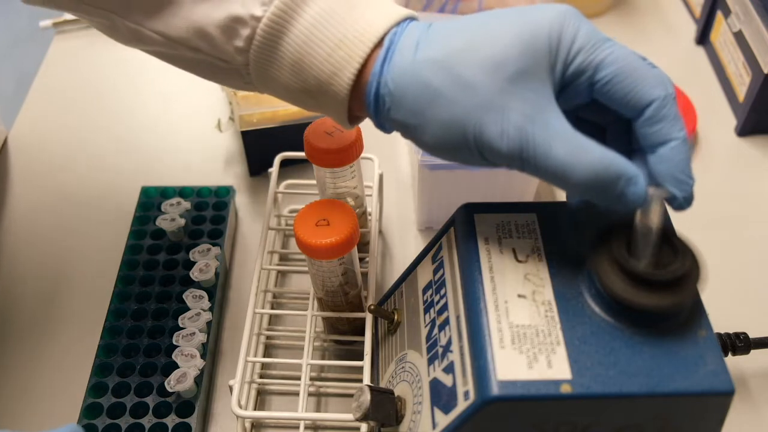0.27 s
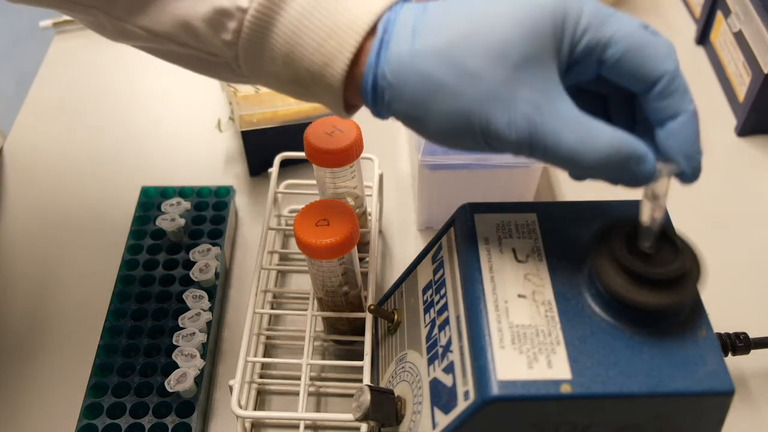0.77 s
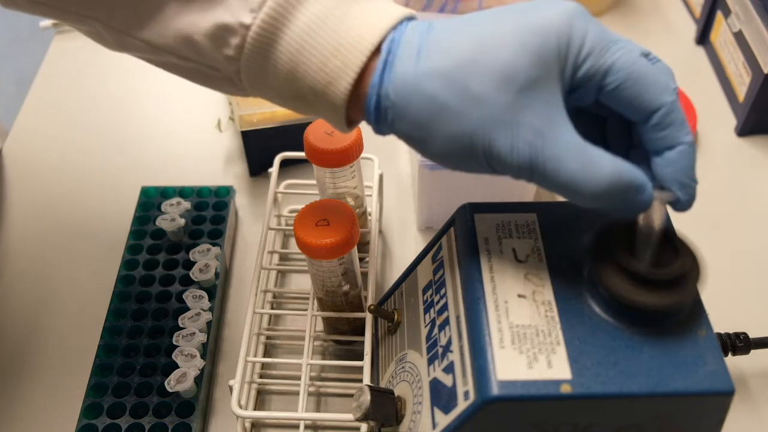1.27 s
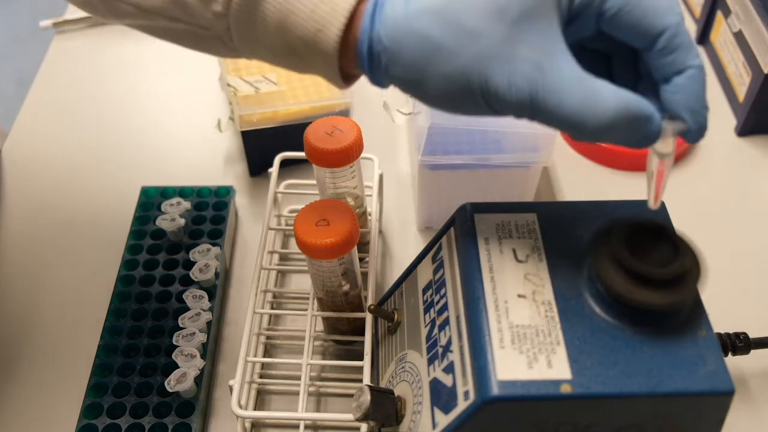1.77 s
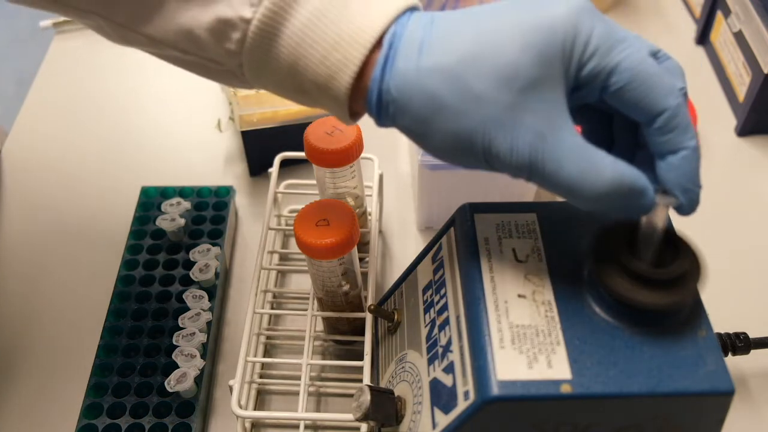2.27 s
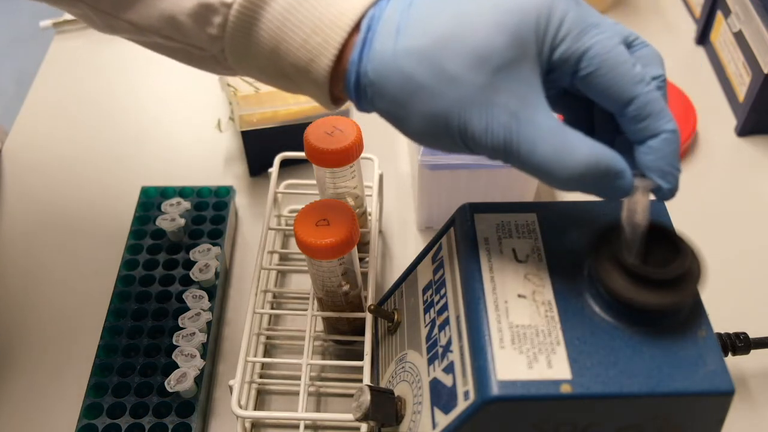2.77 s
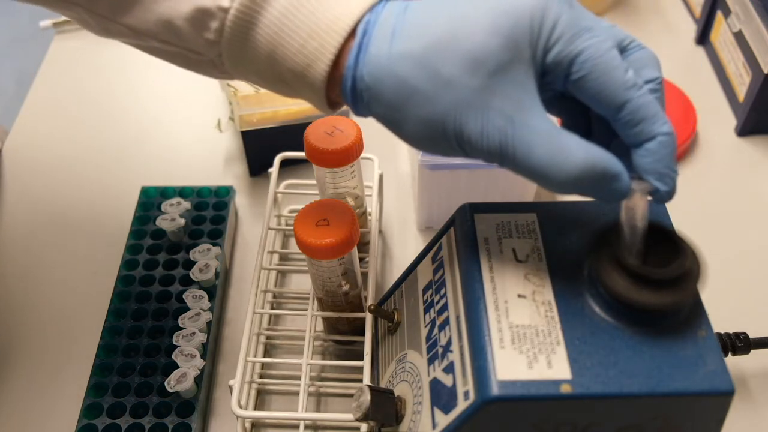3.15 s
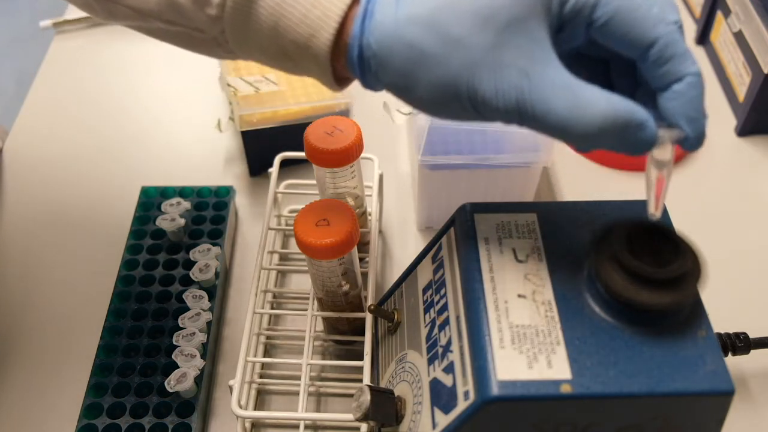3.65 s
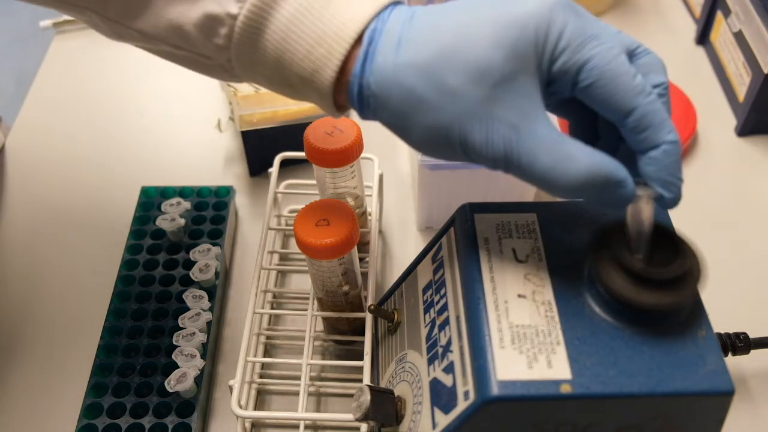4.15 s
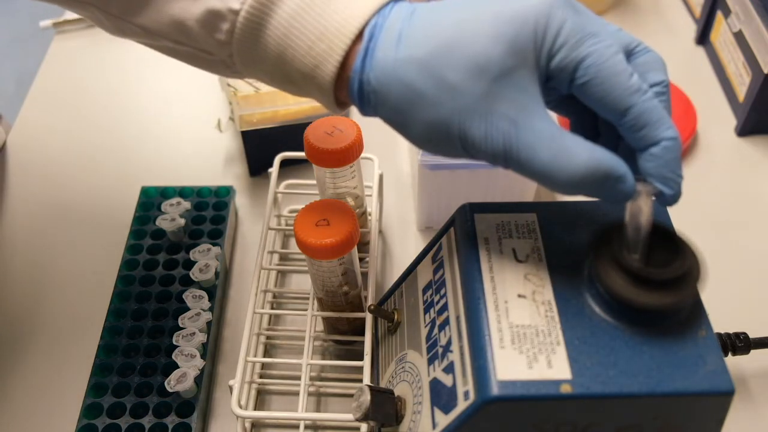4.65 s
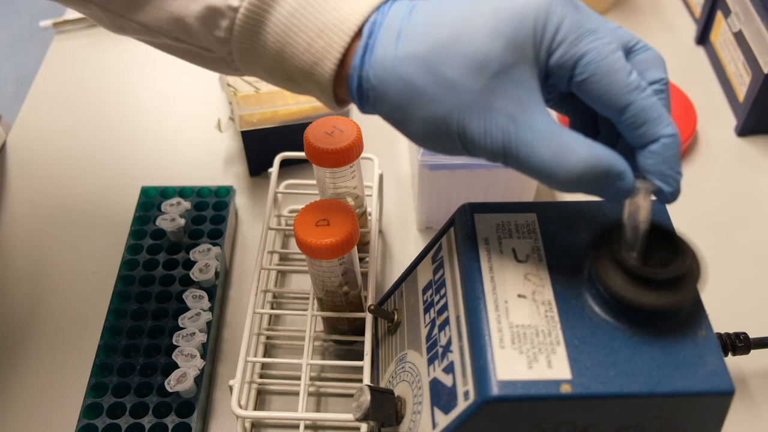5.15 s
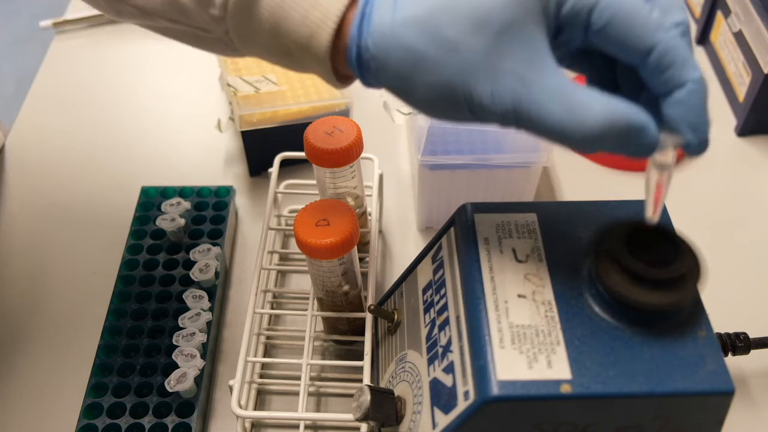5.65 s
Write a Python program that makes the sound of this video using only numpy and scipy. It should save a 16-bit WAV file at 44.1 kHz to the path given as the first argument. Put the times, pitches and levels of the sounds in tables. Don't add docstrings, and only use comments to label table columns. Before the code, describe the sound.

A small electric mixer runs on a lab bench, heard close in stereo. Its low, rough buzz, pulsing about 46 times a second, fades up over the first second and continues to the end with slight dips and surges in speed. Fine bearing hiss and a very faint distant machine drone sit underneath. A plastic tube against the spinning rubber cup chatters softly until 0.4 s, then ticks and rattles hard from 0.8 to 1.5 s, loudest around 1 s. After a gap of mostly humming, loose ticks scatter from 1.9 to 2.3 s, with a brief buzzing lean to 2.4. A longer, duller rattle runs from 2.8 to 3.4 s; sharper bursts follow at 3.8-4.1 and 4.2-4.5 s. Contact is faint around 5 s, a few light ticks lift off at 5.4, and fresh ticks land from 5.8 s as the mixer keeps buzzing.

```python
import sys
import numpy as np
from scipy import signal
from scipy.fft import rfft, irfft
from scipy.io import wavfile
from scipy.ndimage import uniform_filter1d

SR = 44100
rng = np.random.default_rng(int(sys.argv[2]) if len(sys.argv) > 2 else 0)


def wav_record(signal):
    frames = np.transpose(np.atleast_2d(signal))
    bounded = np.clip(frames, -1, 1)
    quanta = np.round(bounded * 32767).astype(np.int16)
    wavfile.write(sys.argv[1], SR, quanta)


def invert_db(x):
    u = np.asarray(x, float) / 20
    return 10 ** u


N = 261072

# time_s, speed_turns_per_s
DRIVE_SPEED = [(0.0, 45.6), (0.375, 45.44), (0.5, 46.52), (0.625, 45.74), (1.375, 45.37), (1.5, 46.42),
               (1.625, 45.63), (2.0, 45.89), (2.125, 45.42), (2.625, 45.92), (2.75, 45.52), (3.25, 45.68),
               (3.375, 45.97), (4.0, 45.6), (5.0, 45.78), (5.25, 45.59), (5.375, 45.89), (5.92, 45.45)]
# order_per_turn, level_db
THUMP_ORDERS = [(1, -19), (2, -5), (3, -6), (4, 0), (5, -4), (6, -3.5), (7, -13), (8, -14.5), (9, -16.5),
                (10, -7.5), (11, -6.5), (12, -21), (13, -20), (14, -22.5), (15, -23), (16, -28),
                (17, -29.5), (18, -27.5), (19, -31), (20, -50), (21, -30.5), (22, -59), (23, -30.5),
                (24, -57.5), (25, -52), (26, -45)]
# mode_hz, width_hz, level_db
CASE_MODES = [(95, 26.4, 4.5), (178.9, 29.7, 2), (235.4, 20.5, 0), (266.3, 36, -3), (354, 37, -11.5),
              (455, 11.5, -6), (502, 16.4, -7), (630, 17.4, -24.5), (724, 10, -34.5), (799, 32, -38),
              (935, 25, -28.5), (1053, 30, -34)]
THUMP_ANGLE_TURNS = 0.04
# time_s, level_db
LOW_ORDER_LEVEL = [(0, -40), (.25, -33.5), (.54, -28), (.79, -24.5), (1.3, -23), (1.6, -22), (1.92, -21),
                   (2.0, -22.5), (2.65, -22.5), (3.6, -21.5), (4.27, -22), (4.36, -22.5), (5.5, -21), (5.92, -21)]
PANEL_ORDERS_DB, PANEL_FLUTTER_DB, PANEL_FLUTTER_HZ = -8.5, 0.32, 9.3

# pitch_hz, level_db_rms
FAR_MACHINE = [(24.6, -49.5), (49.4, -50.5)]

# freq_hz, level_db_per_hz
JOLT_SPECTRUM = [(40, 0.5), (90, 5), (150, 3.5), (280, 7.5), (350, -13), (520, 1), (750, -12.5),
                 (940, -28.5), (1100, -23), (1600, -39)]
# time_s, jolting_db, panel_order_loss_db
UPSETS = [(.13, -52, 6), (.49, -37, 16), (.82, -45, 3.5), (.95, -27.5, 17), (1.05, -27, 11),
          (1.15, -31, 2.5), (1.24, -33, 8), (1.48, -35, 16), (1.66, -46, 0), (1.75, -46, 1), (1.91, -36, 2),
          (1.98, -44, 5), (2.16, -34, -1.5), (2.28, -30, 8), (2.4, -44, 7), (2.52, -46, 3.5),
          (2.63, -40, 4), (2.75, -35, 2.5), (2.98, -60, -1), (3.84, -33, 7), (4.27, -42, -0.5),
          (4.35, -49, 6), (4.78, -41, 3.5), (4.91, -47, 2), (5.21, -35, -1.5), (5.28, -43, 2.5),
          (5.41, -36, 5.5), (5.84, -37, 6)]
UPSET_HALF_S, REST_JOLT_DB = 0.051, -24
LOW_LOSS_SHARE = 0.14
PANEL_HZ, PANEL_WIDTH_HZ, PANEL_DB = 432, 16.4, -10

# freq_hz, level_db_per_hz
HISS_SPECTRUM = [(530, -11.5), (900, -1.5), (1080, -7.5), (1160, -3.5), (1630, -12.5), (2490, -9),
                 (2780, -25), (3030, -38), (3590, -16), (6350, -14.5), (8390, -27.5), (15200, -53),
                 (16400, -40)]
# pitch_hz, width_hz, level_db
BEARING_WHINES = [(2524, 36, -16), (2980, 94, -12.5), (3410, 130, -18), (4630, 69, -22.5),
                  (6380, 73, -20.5)]
HISS_DB, HISS_DB_PER_BASE_DB, HISS_DB_PER_LOAD_DB = -49.5, 0.5, 0.26

# freq_hz, level_db_per_hz
CRACK_SPECTRUM = [(650, -48.5), (1100, -18.5), (1380, 1.5), (1770, -9), (2290, -13.5), (3040, -1),
                  (4310, -2.5), (4670, -0.5), (9090, -8), (9950, -4.5), (11900, -14.5), (14800, -15.5),
                  (16400, -5.5)]
# mode_hz, level_db, t60_s
TUBE_MODES = [(116, -17, 0.1), (250, -15, 0.047), (449.8, 0.5, 0.14), (935, -11.5, 0.052),
              (1330, -11, 0.021), (2120, -5, .025), (2297, 0.5, 0.013), (2442, -5, 0.014),
              (4680, -6, 0.015), (5220, -7.5, 0.03), (10100, -30, .012)]
# start_s, end_s, angle_turns, lift_advance_turns, peak_db
LEANING = [
    (-.08, 0.147, 0.49, -.03, -36),
    (0.164, 0.366, 0.6, 0.1, -29.5),
    (1.061, 1.54, .515, .33, -25.5),
    (1.181, 1.506, 0.58, 0.19, -23.5),
    (1.222, 1.513, .75, 0.25, -26),
    (2.274, 2.424, 0.54, 0.12, -25),
]
SINK_TURNS_PER_S, LIFT_S, LEANING_BRIGHT_DB = 0.3, 0.12, 1.5
SETTLE_S, SETTLE_DB = 0.05, 6
DULL_DB_PER_SOFT_DB, LIFT_LOSS_DB = 0.27, 3.5
# (time_s, half_gap_turns, peak_db)
ROCKING = [
    (.755, 0.5, 0.5, [(.9, .215, -17), (.97, .225, -16), (1.05, .2, -21.5)]),
    (.865, 5, -4, [(2.77, .15, -24.5), (2.83, .225, -22), (2.92, 0.29, -21), (3.05, .22, -22), (3.21, .155, -26.5), (3.3, .175, -25), (3.385, 0.32, -22)]),
    (.875, 5, -5, [(3.88, .325, -20), (3.95, .28, -18), (4.02, 0.14, -20), (4.1, .06, -27.5)]),
    (.84, 8, -2.5, [(4.2, 0.056, -33), (4.28, 0.11, -24), (4.36, .15, -22), (4.44, .13, -23.5), (4.5, .02, -38)]),
    (1, 0.5, -2, [(4.97, 0.22, -38), (5.05, 0.084, -38), (5.14, 0.027, -37)]),
]
LOWER_BRIGHT_DB_PER_DB = 1
# time_s, peak_db, bright_db
LANDING_TICKS = [(.7783, -27, 6.5), (0.7967, -21.5, 5), (0.899, -20, 0), (.9054, -33, 3),
                 (1.937, -21.5, 0.5), (2.1122, -22, -6), (2.1256, -30, 9), (2.135, -18, 0),
                 (2.1452, -21.5, 2), (2.165, -20.5, 4), (2.1818, -28, 1), (2.1952, -27, 7),
                 (2.2138, -26.5, 3), (2.234, -29, 8.5), (2.2597, -30, 10.5), (2.774, -37, 5),
                 (2.7797, -37, 9), (3.8029, -28, 10), (3.8197, -18, 3.5), (4.241, -34, 0), (4.2664, -48, 2),
                 (5.776, -33, 1.5), (5.7933, -21.5, 7.5), (5.8094, -27, 8), (5.8642, -29, -1),
                 (5.8811, -42, 2), (5.887, -21.5, -0.5), (5.9095, -25, 3)]
LANDING_RING_HZ, LANDING_RING_SPREAD = 2200, 0.097
# time_s, peak_db, bright_db, ring_hz
LIFTING_TICKS = [(0.449, -33, -6, 1770), (0.474, -37.5, 8, 2320), (0.4972, -32.5, 6.5, 2960),
                 (1.0495, -16.5, 0, 2740), (1.0687, -28, 4, 2350), (1.5232, -25.5, 7, 2170),
                 (3.4277, -24, 1, 2190), (3.4544, -31, 9.5, 3330), (4.4938, -28, -15, 2980),
                 (4.5093, -26.5, -11, 2860), (4.525, -33, -10, 2930), (5.4005, -38, -1, 2200),
                 (5.405, -33, -1, 1600), (5.4174, -26.5, 1, 2120), (5.445, -28, 9.5, 3650)]

# start_s, end_s, droning_db
CUP_LOADS = [(0.21, 0.383, -48.5), (0.753, 0.812, -51), (0.914, 1.077, -36), (1.25, 1.58, -43.5),
             (1.335, 1.46, -42.5), (2.094, 2.167, -37), (2.774, 3.447, -49.5), (3.82, 3.86, -39),
             (3.87, 4.098, -41), (4.226, 4.316, -34), (4.397, 4.525, -38.5), (4.93, 5.237, -46.5),
             (5.39, 5.75, -74), (5.857, 5.95, -33.5)]
LOAD_EDGE_S, REST_CUP_DB = 0.068, -29.5

# freq_hz, likeness_0_to_1
MIC_LIKENESS = [(60, 0.69), (200, 0.97), (500, 0.9), (1000, 0.8), (2000, 0.71), (4000, 0.57), (8000, 0.42),
                (15000, 0.17)]
# freq_hz, left_minus_right_db
MIC_TILT = [(60, -0.5), (110, -0.5), (200, 0.0), (380, 1.0), (700, 1.0), (1290, -1.0), (2380, -1.0),
            (4400, 1.0), (8120, -2.8), (15000, -6.5)]
LEFT_LAG_S, SELF_NOISE_DB = 4.2e-5, -61.5


def rms_one(x):
    return x / np.sqrt(np.mean(x ** 2) + 1e-20)


def noise():
    return rng.standard_normal((2, N))


def in_time(rows):
    time_s, *columns = np.transpose(rows)
    return [np.interp(np.arange(N) / SR, time_s, column) for column in columns]


def at_hz(points, hz):
    freq_hz, value = np.array(points)[:, 0], np.array(points)[:, 1]
    return np.interp(np.log(hz + 1), np.log(freq_hz), value)


def colour(x, spectrum):
    cepstrum = irfft(np.log(invert_db(at_hz(spectrum, np.linspace(0, SR / 2, 2049)))))
    cepstrum[1:2048] *= 2
    cepstrum[2049:] = 0
    response = irfft(np.exp(rfft(cepstrum)))
    unit_energy = rms_one(response)[None] / 64
    return signal.fftconvolve(x, unit_energy, axes=1)[:, :N]


def drift(rate_hz):
    r = np.exp(-80 * np.pi * rate_hz / SR)
    slow = signal.lfilter([1], [1, -2 * r, r * r], rng.standard_normal(N // 40 + 2002))[2000:]
    return np.interp(np.arange(N) / 40, np.arange(len(slow)), rms_one(slow))


def ring(clicks, hz, t60_s):
    r, w = invert_db(-60 / (t60_s * SR)), 2 * np.pi * hz / SR
    return signal.lfilter([0, np.sin(w)], [1, -2 * r * np.cos(w), r * r], clicks + 1e-18)


def fade(clicks, t60_s):
    power = signal.lfilter([1], [1, -invert_db(-120 / (t60_s * SR))], clicks ** 2 + 1e-18)
    return np.sqrt(power)


def resonance(x, hz, width_hz):
    r, w = np.exp(-np.pi * width_hz / SR), 2 * np.pi * hz / SR
    return rms_one(signal.lfilter([1, 0, -1], [1, -2 * r * np.cos(w), r * r], x))


def controls():
    t = np.arange(N) / SR
    base_db, = in_time(LOW_ORDER_LEVEL)
    loss_db, jolt = 0, invert_db(base_db + REST_JOLT_DB)
    for time_s, jolt_db, order_loss_db in UPSETS:
        upset = np.clip(1 - abs(t - time_s) / UPSET_HALF_S, 0, 1)
        loss_db = loss_db + order_loss_db * upset
        jolt = jolt + invert_db(jolt_db) * upset ** 2
    load = invert_db(base_db + REST_CUP_DB)
    for start_s, end_s, droning_db in CUP_LOADS:
        inside_s = np.minimum(t - start_s, end_s - t)
        load = load + invert_db(droning_db) * np.clip(0.5 + inside_s / LOAD_EDGE_S, 0, 1)
    cup_db = 20 * np.log10(load)
    load_rise_db = cup_db - base_db - REST_CUP_DB
    hiss_db = HISS_DB + HISS_DB_PER_BASE_DB * (base_db + 23) + HISS_DB_PER_LOAD_DB * load_rise_db
    flutter_db = PANEL_FLUTTER_DB * drift(PANEL_FLUTTER_HZ)
    panel_db = base_db + PANEL_ORDERS_DB - loss_db + flutter_db
    return base_db - LOW_LOSS_SHARE * loss_db, panel_db, 20 * np.log10(jolt), cup_db, hiss_db


def thump(turn, low_db, panel_db, wobble):
    orders, levels_db = np.transpose(THUMP_ORDERS)
    hz = orders * np.mean(np.array(DRIVE_SPEED)[:, 1])
    case = 0
    for i, (mode_hz, width_hz, level_db) in enumerate(CASE_MODES):
        response = mode_hz * width_hz / (mode_hz ** 2 - hz ** 2 + 1j * hz * width_hz)
        case = case + (-1) ** (i + 1) * invert_db(level_db) * response
    low, panel = np.zeros(N), np.zeros(N)
    for order, level_db, phase in zip(orders, levels_db, np.angle(case)):
        loose = wobble * order ** 0.3
        angle = 2 * np.pi * order * (turn - THUMP_ANGLE_TURNS) + phase + loose * drift(13)
        group = panel if order > 8 else low
        group += invert_db(level_db) * (1 + loose * drift(3.2)) * np.cos(angle)
    return invert_db(low_db) * rms_one(low) + invert_db(panel_db) * rms_one(panel)


def drone():
    t = np.arange(N) / SR
    out = 0
    for hz, level_db in FAR_MACHINE:
        out = out + invert_db(level_db + 1.5 * drift(1.5)) * np.sqrt(2) * np.sin(2 * np.pi * hz * t)
    return out


def jolting(turn, jolt_db, panel_db):
    beat = 1 + 0.56 * np.cos(2 * np.pi * (turn - 0.45))
    case = invert_db(jolt_db + 0.5 * drift(14)) * beat * colour(noise(), JOLT_SPECTRUM)
    smooth_db = uniform_filter1d(panel_db, size=SR // 5)
    panel = resonance(noise(), PANEL_HZ, PANEL_WIDTH_HZ)
    return case + invert_db(smooth_db + PANEL_DB + 4.5 * drift(1)) * panel


def bearings(turn, hiss_db):
    hiss = colour(noise(), HISS_SPECTRUM)
    for hz, width_hz, level_db in BEARING_WHINES:
        hiss = hiss + invert_db(level_db + 2.5 * drift(1.6)) * resonance(noise(), hz, width_hz)
    breath_db = 1.64 * np.cos(2 * np.pi * (turn - 0.55))
    return invert_db(hiss_db + 1.74 * drift(16) + breath_db) * hiss


def contacts():
    out = []
    for middle, weaker_db, bright_db, rows in ROCKING:
        s, gap, peak_db = np.transpose(rows)
        lower_bright_db = bright_db + LOWER_BRIGHT_DB_PER_DB * weaker_db
        out.append((s, middle + gap, peak_db, bright_db))
        out.append((s, middle - gap, peak_db - weaker_db, lower_bright_db))
    for start_s, end_s, angle, advance, peak_db in LEANING:
        s = np.linspace(start_s, end_s, 20)
        lift = np.clip(1 - (end_s - s) / LIFT_S, 0, 1) ** 1.9
        settle_db = SETTLE_DB * np.clip(1 - (s - start_s) / SETTLE_S, 0, 1)
        where = angle - SINK_TURNS_PER_S * (s - start_s) + advance * lift
        bright_db = LEANING_BRIGHT_DB + DULL_DB_PER_SOFT_DB * (peak_db + 24)
        out.append((s, where, peak_db - settle_db - LIFT_LOSS_DB * lift, bright_db))
    return out


def tube_blows(turn):
    starts_s = np.interp(np.arange(int(turn[-1])), turn, np.arange(N) / SR)
    at, peak_db, bright_db = [], [], []
    for s, angle, level_db, contact_bright_db in contacts():
        laps = np.flatnonzero((starts_s > s[0] - 0.011) & (starts_s < s[-1] + 0.006))
        chance = rng.standard_normal((len(laps), 2))
        where = laps + np.interp(starts_s[laps], s, angle) + 0.004 * chance[:, 0]
        at += list(np.interp(where, turn, np.arange(N)).astype(int))
        peak_db += list(np.interp(starts_s[laps], s, level_db) + 0.8 * chance[:, 1])
        bright_db += [contact_bright_db] * len(laps)
    return np.array(at), np.array(peak_db), np.array(bright_db)


def tube(turn):
    at, peak_db, blow_bright_db = tube_blows(turn)
    tick_s, tick_db, tick_bright_db = np.transpose(LANDING_TICKS + [row[:3] for row in LIFTING_TICKS])
    spread = LANDING_RING_SPREAD * rng.uniform(-1, 1, len(LANDING_TICKS))
    tick_hz = np.r_[LANDING_RING_HZ * (1 + spread), [row[3] for row in LIFTING_TICKS]]
    ticks = (tick_s * SR).astype(int)

    clicks = np.zeros(N)
    clicks[at] = invert_db(peak_db + blow_bright_db)
    clicks[ticks] = invert_db(tick_db + tick_bright_db)
    chatter = invert_db(-9) * fade(clicks, 0.009) * noise()
    dull_noise = signal.lfilter([0.6], [1, -0.4], noise())
    wash = invert_db(-15.5) * fade(clicks, 0.1) * dull_noise
    cracks = np.array([clicks, np.roll(clicks, 14)])
    mid, side = colour(chatter + wash + invert_db([[8.0], [5.0]]) * cracks, CRACK_SPECTRUM)

    clicks[ticks] = invert_db(tick_db)
    clicks[at] = invert_db(peak_db)
    modes = 0
    for hz, level_db, t60_s in TUBE_MODES:
        uneven = clicks * invert_db(rng.normal(0, 1.0, N))
        modes = modes + invert_db(level_db - 10.5) * ring(uneven + 0.19 * wash[0], hz, t60_s)
    for i, level_db, hz in zip(ticks, tick_db, tick_hz):
        age_s = np.arange(min(1500, N - i)) / SR
        decay = invert_db(level_db - 13 - 60 * age_s / 0.031)
        modes[i:i + len(age_s)] += decay * np.sin(2 * np.pi * hz * age_s)
    return np.array([mid + modes, side + 0.18 * np.roll(modes, 9)])


def cup(cup_db):
    return invert_db(cup_db - 5) * resonance(noise(), 929, 45)


def microphones(mid, side):
    mid, side = np.pad([mid, side], [(0, 0), (2048, 2048)], mode="reflect")
    hz = np.fft.rfftfreq(len(mid), 1 / SR)
    alike = np.clip(at_hz(MIC_LIKENESS, hz), 0, 1)
    both = np.sqrt((1 + alike) / 2) * rfft(mid)
    own = np.sqrt((1 - alike) / 2) * rfft(side)
    tilt = invert_db(at_hz(MIC_TILT, hz) / 2) * np.exp(-1j * np.pi * hz * LEFT_LAG_S)
    return irfft([(both + own) * tilt, (both - own) / tilt], len(mid))[:, 2048:-2048]


def scene():
    turn = np.cumsum(in_time(DRIVE_SPEED)[0]) / SR
    low_db, panel_db, jolt_db, cup_db, hiss_db = controls()
    fade_in = invert_db(np.minimum(uniform_filter1d(low_db, size=SR // 8) + 23, 0))
    steady = thump(turn, low_db, panel_db, wobble=0.057) + fade_in * drone()
    mid, side = jolting(turn, jolt_db, panel_db) + bearings(turn, hiss_db) + tube(turn) + cup(cup_db)
    self_noise = fade_in ** 1.3 * invert_db(SELF_NOISE_DB) * noise()
    return microphones(mid + steady, side + 14.0 * np.gradient(steady)) + self_noise


def top_cut(x):
    return signal.sosfilt(signal.butter(12, 16500, fs=SR, output="sos"), x)


def record(dry):
    low_pass = signal.cheby2(10, 40, 16200, fs=SR, output="sos")
    mix = signal.sosfilt(low_pass, dry)
    return top_cut(mix)


dry = scene()
out = record(dry)
wav_record(out)
```